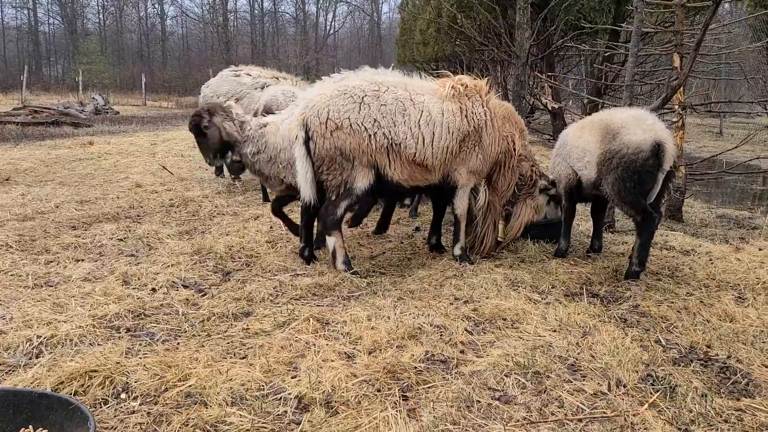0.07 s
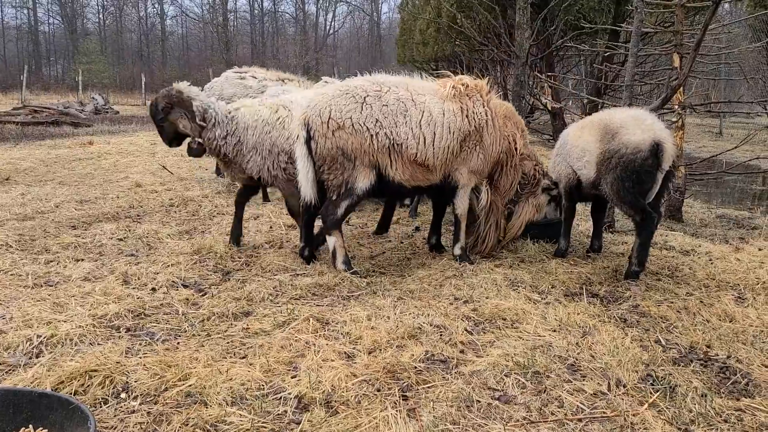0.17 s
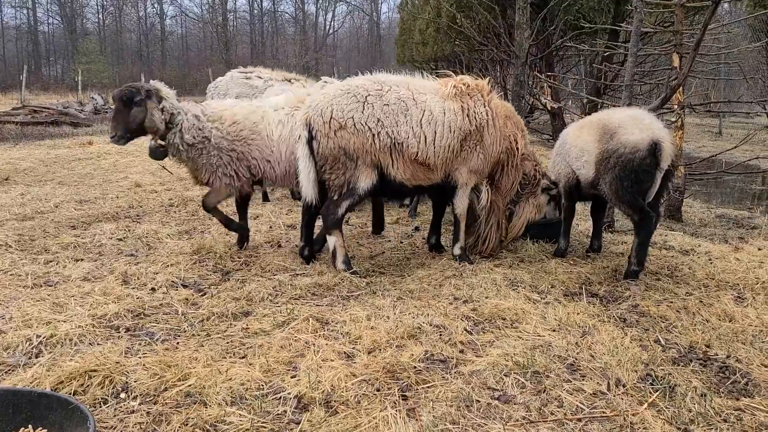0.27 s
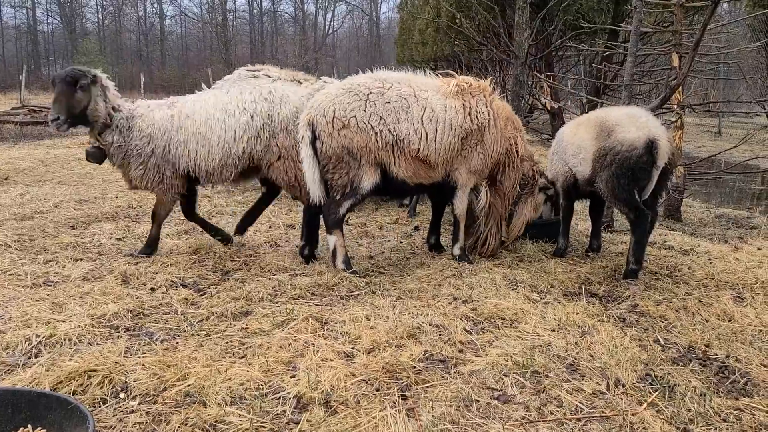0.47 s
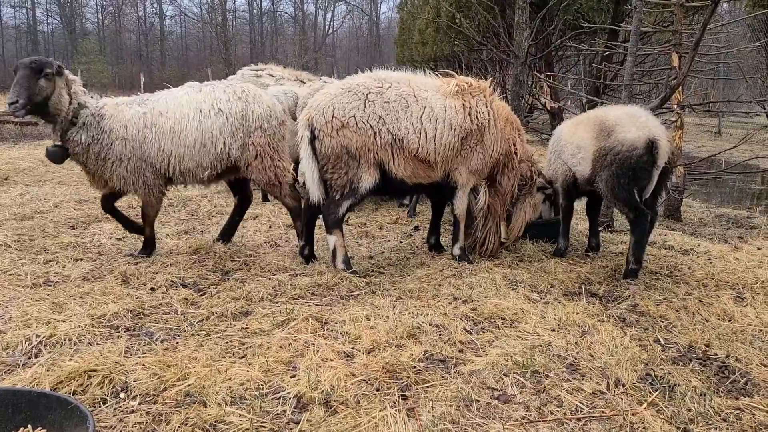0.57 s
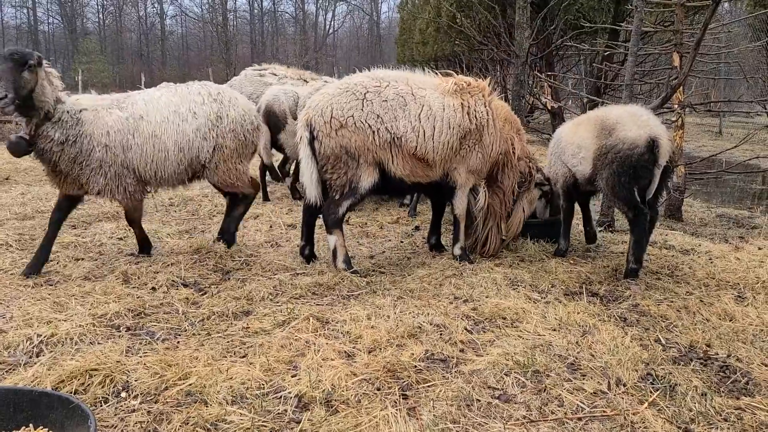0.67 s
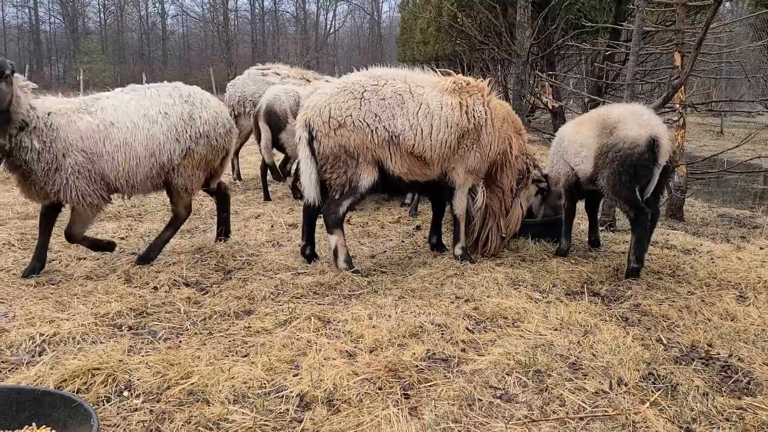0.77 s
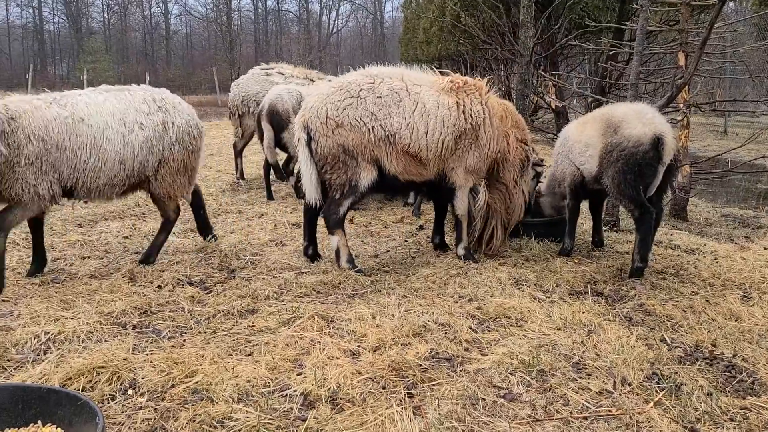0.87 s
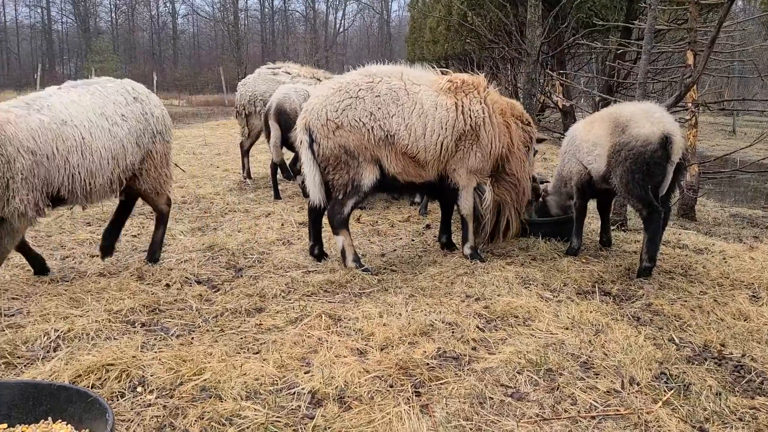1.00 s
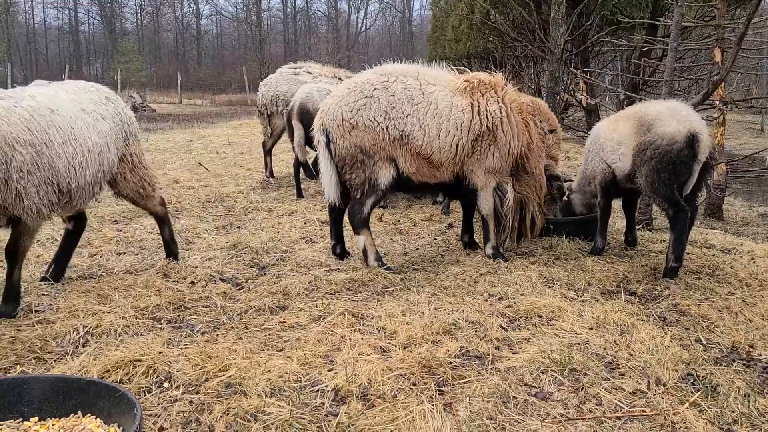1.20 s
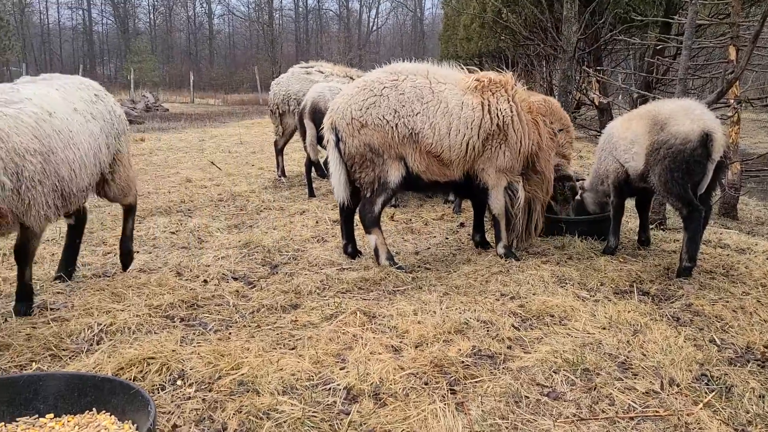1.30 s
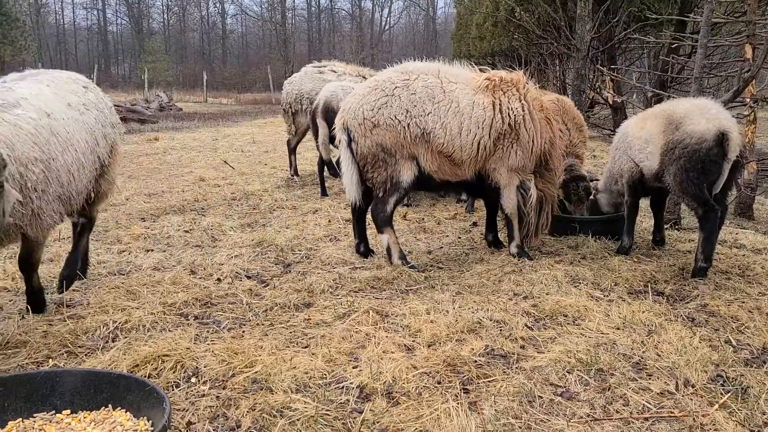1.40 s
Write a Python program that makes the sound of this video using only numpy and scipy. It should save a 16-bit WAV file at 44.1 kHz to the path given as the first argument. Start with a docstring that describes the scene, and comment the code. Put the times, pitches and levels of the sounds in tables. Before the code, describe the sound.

A sheep's metal bell clanks unevenly as the animal walks through an open field.

```python
"""An open field: a sheep walks past, the clapper clanking unevenly against its sheet-metal bell.
The bell's modes ring, some in close pairs that beat, under a short bright shimmer, and the clapper
chatters along the wall between blows. A deeper bell rings softly in the flock; trees scatter both.
Light wind rumbles, straw rustles, and there are two soft knocks."""
import sys
import numpy as np
from scipy import signal
from scipy.fft import rfft, irfft
from scipy.io import wavfile

SR = 44100
rng = np.random.default_rng(int(sys.argv[2]) if len(sys.argv) > 2 else 0)


def put_to_file(sound):
    """Save the sound as 16-bit audio at rate SR, in the file named by the first command-line argument."""
    columns = np.atleast_2d(sound).T  # one column per channel
    safe = np.clip(columns, -1, 1)
    whole_steps = np.round(safe * 32767)
    wavfile.write(sys.argv[1], SR, whole_steps.astype(np.int16))


N = 63945


def from_db(db):
    """Decibels to gain."""
    return 10 ** (np.asarray(db) / 20)


def unit_power(x):
    """Scale to an RMS of 1."""
    return x / np.sqrt(np.mean(x ** 2) + 1e-20)


def clock():
    """Time of each sample in seconds."""
    return np.arange(N) / SR


def automation(points):
    """Straight ramps between (time_s, value) breakpoints."""
    return np.interp(clock(), *np.transpose(points))


def pan(db):
    """Stereo gains, the left louder than the right by db."""
    return from_db(np.array([[.5], [-.5]]) * db)


def drift(rate_hz):
    """Smooth random modulation with a spread of about 1."""
    hz = np.arange(2 * N + 1) * SR / (4 * N)
    return unit_power(irfft(rfft(rng.standard_normal(4 * N)) / (1 + (hz / rate_hz) ** 2)))[:N]


# Stereo image of every noise layer: frequency_hz, left_right_correlation
NOISE_IMAGE = [(30, 0.28), (120, 0.41), (300, 0.67), (700, 0.31), (3000, 0.1), (12000, 0.034)]

def noise(spectrum, fade_above=False):
    """Unit-power stereo noise through an EQ curve, rolled off below it and optionally above."""
    hz = np.maximum(np.fft.rfftfreq(N, 1 / SR), 1)
    curves = np.array(spectrum), np.array(NOISE_IMAGE)
    level_db, alike = [np.interp(np.log(hz), np.log(c[:, 0]), c[:, 1]) for c in curves]
    gain = from_db(level_db) * np.minimum(hz / spectrum[0][0], 1) ** 2
    if fade_above:
        gain *= np.minimum(spectrum[-1][0] / hz, 1) ** 2
    mid, side = rfft(rng.standard_normal((2, N)))
    stereo = np.sqrt(1 + alike) * mid + np.sqrt(1 - alike) * side * [[1], [-1]]
    return unit_power(irfft(gain * stereo, N))


# Tone of the wind: frequency_hz, level_db
WIND_EQ = [(13, -56.5), (22, -10), (48, 1), (70, 2), (99, -5.5), (144, -15), (350, -28.5), (431, -43),
           (600, -52), (780, -42), (1320, -120)]
# Its gusts: time_s, level_db
WIND_GUSTS = [(0.0, -32.5), (0.032, -34), (0.924, -43.5), (0.956, -35.5), (1.028, -51), (1.158, -42.5),
              (1.45, -48.5)]

def wind():
    """A low rumble that rises and falls with the gusts."""
    return from_db(automation(WIND_GUSTS)) * noise(WIND_EQ, fade_above=True)


# Tone of the straw and far hiss: frequency_hz, level_db
STRAW_EQ = [(200, 3.5), (400, -1), (800, -5), (1600, -21.5), (2600, -19.5), (6000, -13.5), (15000, -47)]

def straw(level_db=-56.5, flutter_db=3):
    """A thin hiss whose level flutters into a rustle."""
    return from_db(level_db + flutter_db * drift(rate_hz=27)) * noise(STRAW_EQ)


# Knocks among the flock: peak_s, level_db
KNOCK_HITS = [(1.367, -41), (1.412, -46)]
# Their tone: frequency_hz, level_db
KNOCK_EQ = [(150, -31), (350, 8), (550, 4.5), (900, -26), (4000, -58)]

def knocks(width_s=0.0048):
    """Short, dull pulses of noise with a soft attack."""
    pulses = sum(from_db(db) * np.exp(-.5 * ((clock() - s) / width_s) ** 2) for s, db in KNOCK_HITS)
    return noise(KNOCK_EQ, fade_above=True) * pulses


def tree_scatter(bells, send_db=-13, t60_s=1, lowpass_hz=3920):
    """A faint, diffuse reverb from the trees, which swallow the treble."""
    tail = rng.standard_normal((2, N)) * from_db(-60 * clock() / t60_s)
    dull = signal.sosfilt(signal.butter(2, lowpass_hz, fs=SR, output="sos"), bells)
    return from_db(send_db) * signal.fftconvolve(dull, unit_power(tail) / np.sqrt(N), axes=1)[:, :N]


# How much earlier the ring reaches the left ear: time_s, lead_ms
LEFT_LEAD = [(0, 0.065), (0.4, 0.18), (1.1, 0.2573)]
SWING_DB, SWING_RADIANS, SWING_RATE_HZ = 2, 0.39, 11.9   # the swinging bell makes each mode waver

def bell_mode(starts, blow_db, hz, t60_s, pan_db, attack_s, choked_db=0):
    """Each blow adds energy and shifts the phase; the ring swells, then dies freely or is choked."""
    t = clock()
    loss_db = 60 * t / t60_s + choked_db
    kicks = from_db(blow_db + 60 * np.minimum(starts, 0) / t60_s)   # blows before 0 s have decayed
    height = np.full(N, 1e-9)
    phase = rng.uniform(0, 2 * np.pi) + SWING_RADIANS * drift(SWING_RATE_HZ)
    for i, kick in zip((np.maximum(starts, 0) * SR).astype(int), kicks):
        phase[i:] += np.arctan2(kick, height[i])
        height[i:] = np.hypot(kick, height[i]) * from_db(loss_db[i] - loss_db[i:])
    ring = height * np.exp(1j * phase)
    lag = np.exp(-1 / (attack_s * SR))
    ring = signal.lfilter([1 - lag], [1, -lag], ring, zi=[lag * ring[0]])[0]
    ring *= from_db(SWING_DB * drift(SWING_RATE_HZ))
    ear_time = np.array([t + automation(LEFT_LEAD) / 1000, t])
    return pan(pan_db) * np.imag(ring * np.exp(2j * np.pi * hz * ear_time))


# Blows on the deeper bell: start_s, level_db
DEEP_HITS = [(-0.1, -42), (0.398, -27.5), (0.485, -46), (0.83, -38)]
# Its modes: pitch_hz
DEEP_PITCHES = [827, 2289, 3337, 4075, 4891, 6126, 6834, 11047, 11610]
# How each rings: level_db, t60_s, pan_db, attack_s
DEEP_RINGS = [(-7, 1.04, -6, 0.016), (-20.5, 1.75, -11, 0.0037), (-9.5, 2.88, -2, 0.0022),
              (-7.5, 0.24, -12, 0.0011), (-2.5, 0.79, -5.5, 0.0027), (0.5, 0.058, 20, 0.00067),
              (-9.5, 0.71, -5, 0.00077), (-14.5, 0.1, 18.5, .001), (-16, 0.15, -37, 0.0012)]

def deep_bell():
    """A deeper bell in the flock, nudged gently."""
    starts, blow_db = np.transpose(DEEP_HITS)
    return sum(bell_mode(starts, blow_db + db, hz, t60_s, pan_db, attack_s)
               for hz, (db, t60_s, pan_db, attack_s) in zip(DEEP_PITCHES, DEEP_RINGS))


# Fader ride of the chatter: time_s, level_db
CHATTER_FADER = [(0, -45), (0.2, -71.5), (0.27, -53), (0.40, -43), (0.5, -41), (0.62, -43.5), (0.72, -53),
                 (0.82, -60), (1.02, -67), (1.06, -43.5), (1.16, -52), (1.22, -86)]
# Bands of weak modes that it stirs: edge_hz, other_edge_hz, level_db
CHATTER_BANDS = [(3086, 3100, 0), (3943, 2800, -1.5), (5600, 6100, -2), (8810, 11000, -9.5),
                 (9700, 9800, -24), (12560, 6400, -8.5), (13300, 15600, 1.5)]
SHIMMER_PAN_DB = -6.5   # chatter and shimmer sit to the right

def clapper_chatter(modes_per_band=6, touches_per_s=260, t60_s=0.066, spread_db=4.5):
    """Tiny random touches of the clapper along the wall ring clusters of weak modes."""
    t = clock()[:SR // 8]
    ring = 0
    for edge_hz, other_edge_hz, db in CHATTER_BANDS:
        for place, left, right in rng.random((modes_per_band, 3)):
            hz = edge_hz + place * (other_edge_hz - edge_hz)
            ring += from_db(db) * np.sin(2 * np.pi * (hz * t + np.array([[left], [right]])))
    ring = unit_power(ring * from_db(-60 * t / t60_s)) / np.sqrt(len(t))
    contacts = rng.random(N) < touches_per_s / SR
    touches = unit_power(contacts * from_db(spread_db * rng.standard_normal(N)))
    touches *= from_db(automation(CHATTER_FADER))
    return pan(SHIMMER_PAN_DB) * signal.fftconvolve([touches], ring, axes=1)[:, :N]


def bursts(since_s, level_db, t60_s):
    """Summed envelopes, one per blow: instant attack, exponential decay."""
    return from_db(level_db) @ ((since_s >= 0) * from_db(-60 * np.abs(since_s) / t60_s))


# Clapper blows: start_s, drive_db for each of the seven main modes, shimmer_db,
# bright_spot_hz, choke_db (sign ignored)
CLAPPER_HITS = [ (-0.005, -35.5, -40.5, -43.5, -30, -36, -32, -37, -45, 14900, 2),
                (0.124, -37, -34, -52.5, -50, -39.5, -54.5, -58, -57, 13200, -0.5),
                (0.2318, -22.5, -38.5, -41, -29.5, -46, -23, -29, -30.5, 12250, -1.5),
                (0.2981, -19, -13, -36.5, -38, -34, -26, -23, -23, 12900, 1),
                (0.3758, -17, -19, -33, -28, -44, -53, -48, -54, 13300, 0.5),
                (0.394, -28, -62, -58.5, -40, -46, -50, -46, -43, 13900, 3.5),
                (0.4812, -48, -61, -50, -60, -48, -43, -36, -31, 14400, 6),
                (0.5315, -36.5, -17.5, -42.5, -14.5, -30, -29, -15, -22, 13550, 2.5),
                (0.5692, -24, -14, -26, -10, -21, -47, -55, -25, 12700, 4.5),
                (0.6104, -33.5, -39, -20, -38, -29, -44, -26, -35, 14100, 9.5),
                (0.651, -46.5, -46.5, -28, -52, -46, -49, -35, -40.5, 12800, 1.5),
                (0.7125, -30, -17, -32, -28, -42, -44, -34, -32, 13800, 1.5),
                (0.7365, -23.5, -41, -33, -30.5, -37, -49, -35.5, -45, 14800, 6.5),
                (0.9815, -36.5, -69, -52, -63, -39, -62, -50, -54, 13100, 0.5),
                (1.033, -53, -14, -31, -15, -36, -24.5, -22.5, -26, 14950, 2.5),
                (1.1149, -38.5, -19, -20, -22, -44, -46, -20.5, -30, 11950, 2),
                (1.1662, -43, -49, -35, -29.5, -59, -45.5, -39.5, -39.5, 14700, 1.5),
                (1.2333, -40, -72, -31, -53, -28.5, -47, -39, -62, 14040, 5.5),
                (1.337, -30, -44, -68, -61, -53, -85, -71, -65.5, 14040, 2),
                (1.4045, -39.5, -39.5, -54, -79, -33, -63, -50.5, -58, 13300, -1.5)]
# The near bell's main modes: pitch_hz
MAIN_PITCHES = [1253.2, 1305.8, 3304, 5887, 5970, 8804, 9043]
# How each rings: level_db, t60_s, pan_db, attack_s
MAIN_RINGS = [(0, 1, -1, 0.0013), (0, 1, -0.5, 0.00057), (0, 0.66, -4, 0.0069), (0, 0.55, -4, 0.00038),
              (0, 0.24, -9.5, 0.0015), (0, 0.47, -6.5, 0.00058), (0, 0.28, -5, 0.00059)]
# Its high modes: pitch_hz
SHIMMER_PITCHES = [4005, 7860, 11946, 12120, 12925, 13270, 13770, 14093, 14244, 14466, 14772, 15202, 15703]
# How each rings: level_db, t60_s
SHIMMER_RINGS = [(-9, 0.061), (-29.5, 0.14), (1, 0.094), (1, 0.063), (-11, 0.19), (-10, 0.11), (-1, 0.054),
                 (-0.5, .13), (-9, 0.06), (-15, 0.08), (-8.5, 0.1), (-5.5, 0.19), (-14, .12)]
# The crack of dense, quickly dying modes: frequency_hz, level_db
CRACK_EQ = [(900, -35.5), (1200, -35), (1800, -1.5), (2600, -17.5), (3900, -2), (5000, -8), (6200, 11.5),
            (7600, -11), (9000, -10.5), (10500, -7), (12200, 4), (15500, 4.5), (16500, -15)]
# The dull clunk of a blow: frequency_hz, level_db
CLUNK_EQ = [(850, -12.5), (1100, 5.5), (1400, -3.5), (2000, -20), (2700, -24.5), (4200, -2), (6000, -41.5)]
CHOKE_S, RADIATES_ABOVE_HZ = 0.013, 1007   # the clapper stays on the wall for CHOKE_S
SPOT_DB, SPOT_WIDTH_HZ, SCATTER_DB = 8.5, 500, 4.5   # each blow colours the shimmer differently
CRACK_DB, CLUNK_DB = 5.5, -17   # relative to the drive of the shimmer and of the second mode

def near_bell():
    """Where the clapper lands sets each mode's share; every blow opens with a crack and a clunk."""
    starts, *drives_db, shimmer_db, spot_hz, choke_db = np.transpose(CLAPPER_HITS)
    since_s = clock() - starts[:, None]
    choked_db = np.abs(choke_db) @ np.clip(since_s / CHOKE_S, 0, 1)
    bell = 0
    for drive_db, hz, (db, t60_s, pan_db, attack_s) in zip(drives_db, MAIN_PITCHES, MAIN_RINGS):
        bell += bell_mode(starts, drive_db + db, hz, t60_s, pan_db, attack_s, choked_db)
    for hz, (db, t60_s) in zip(SHIMMER_PITCHES, SHIMMER_RINGS):
        boost_db = SPOT_DB * np.exp(-.5 * ((hz - spot_hz) / SPOT_WIDTH_HZ) ** 2)
        blow_db = shimmer_db + db + boost_db + rng.normal(0, SCATTER_DB, len(starts))
        bell += bell_mode(starts, blow_db, hz, t60_s, SHIMMER_PAN_DB, attack_s=0.0004)
    crack = pan(db=-1) * bursts(since_s, shimmer_db + CRACK_DB, t60_s=0.048) * noise(CRACK_EQ)
    clunk = bursts(since_s, drives_db[1] + CLUNK_DB, t60_s=0.036) * noise(CLUNK_EQ, fade_above=True)
    low_cut = signal.butter(6, RADIATES_ABOVE_HZ, "high", fs=SR, output="sos")
    return signal.sosfilt(low_cut, bell + crack + clunk)


def scene():
    """Both bells and their reverb over the bed of field sounds."""
    bells = near_bell() + clapper_chatter() + deep_bell()
    return bells + tree_scatter(bells) + knocks() + wind() + straw()


def record(dry):
    """A steep high cut takes off the very top."""
    cutoff_hz = 16400
    return signal.sosfilt(signal.ellip(10, .1, 80, cutoff_hz, fs=SR, output="sos"), dry)


dry = scene()
out = record(dry)
put_to_file(out)
```